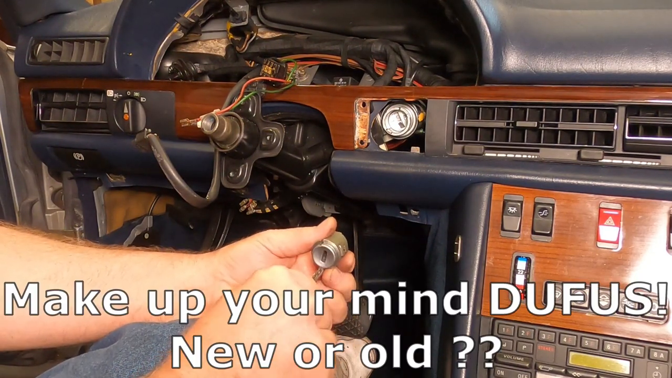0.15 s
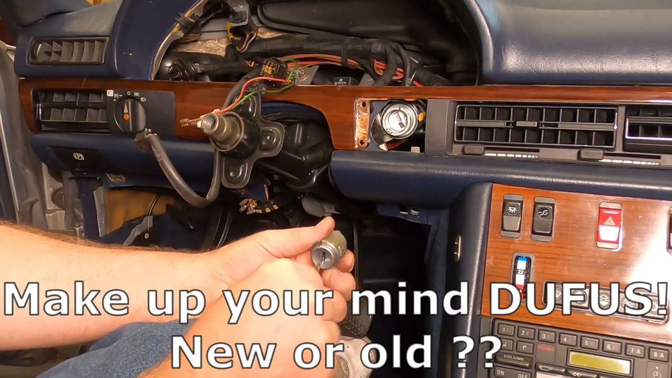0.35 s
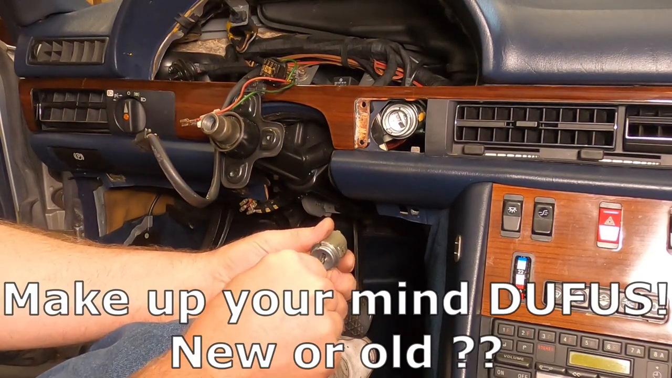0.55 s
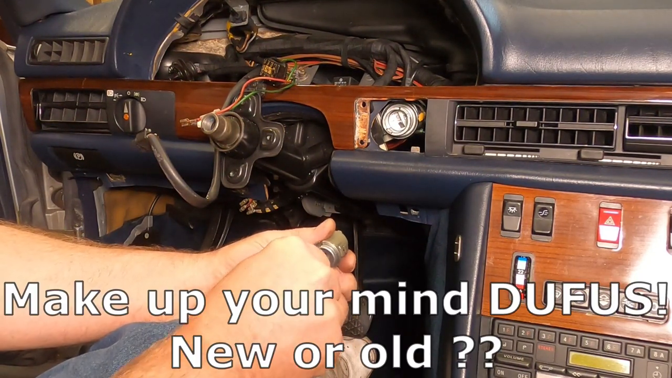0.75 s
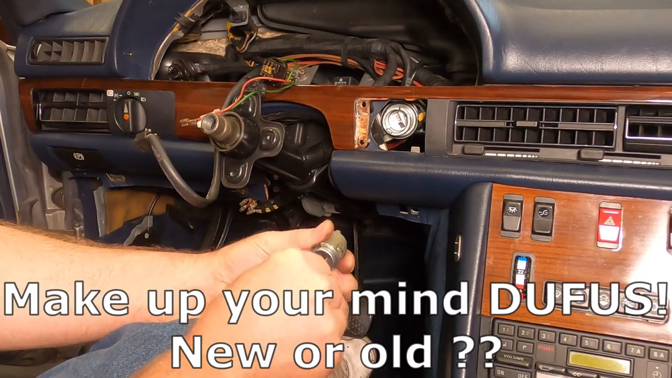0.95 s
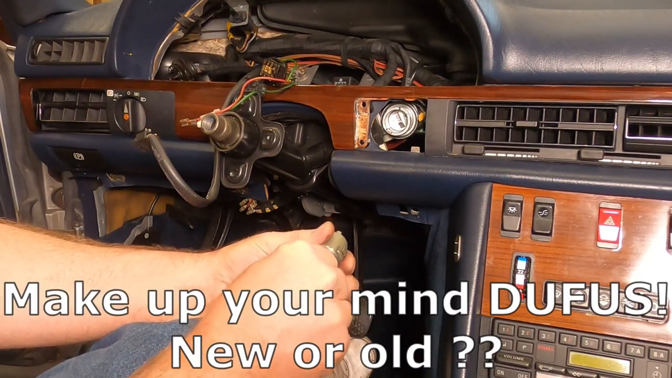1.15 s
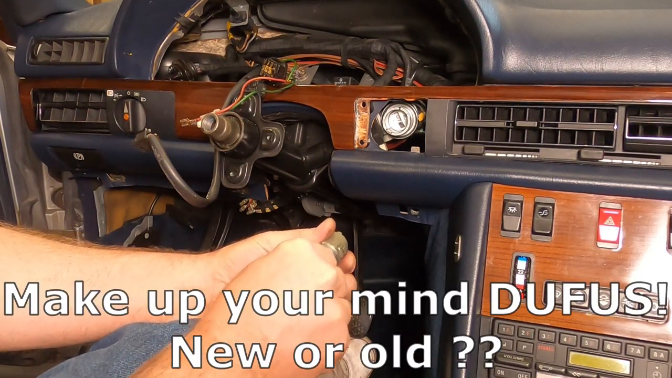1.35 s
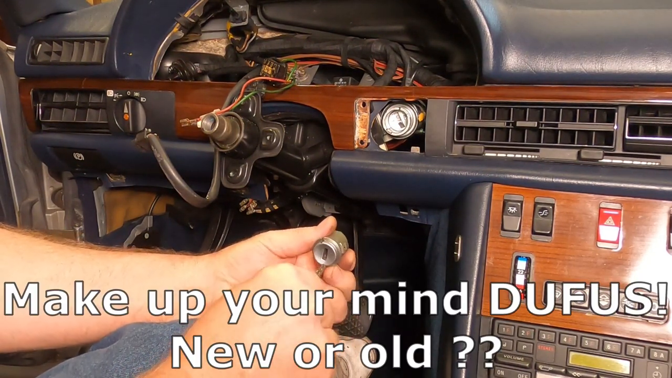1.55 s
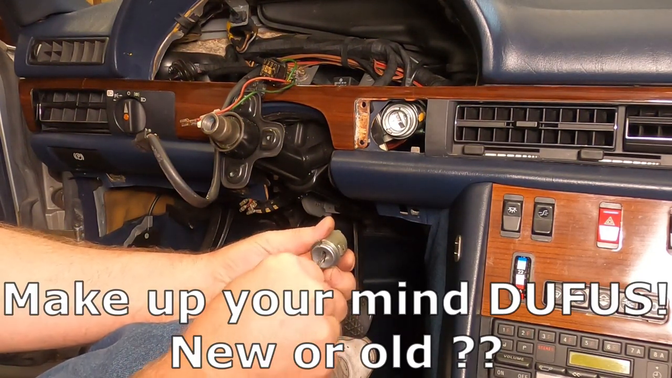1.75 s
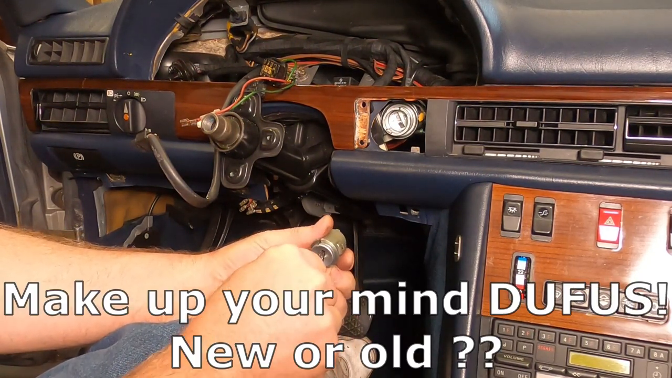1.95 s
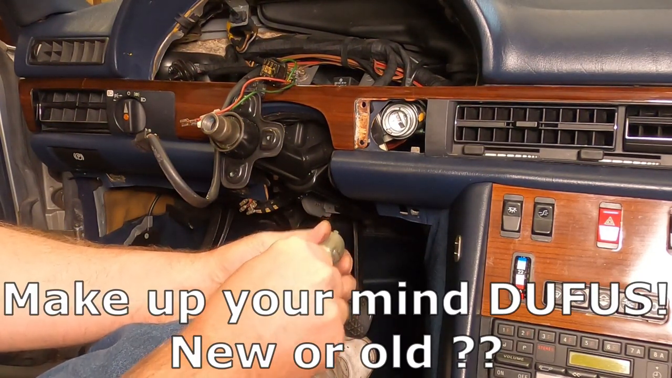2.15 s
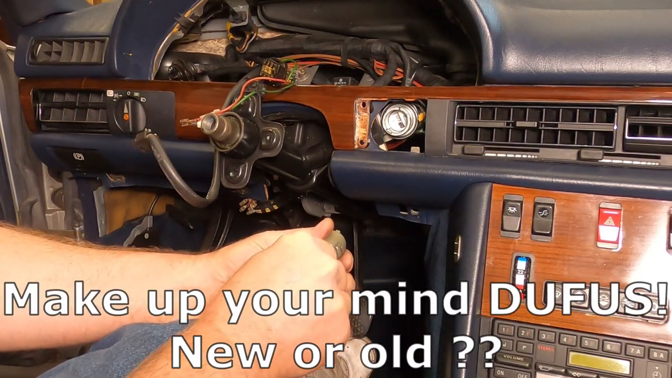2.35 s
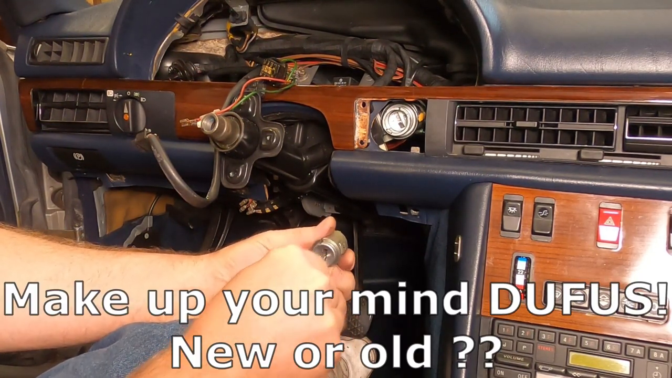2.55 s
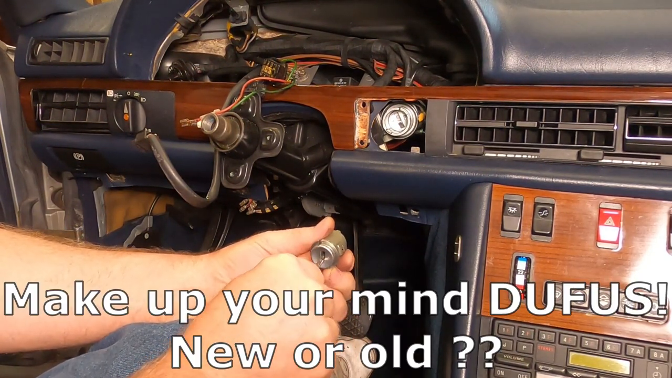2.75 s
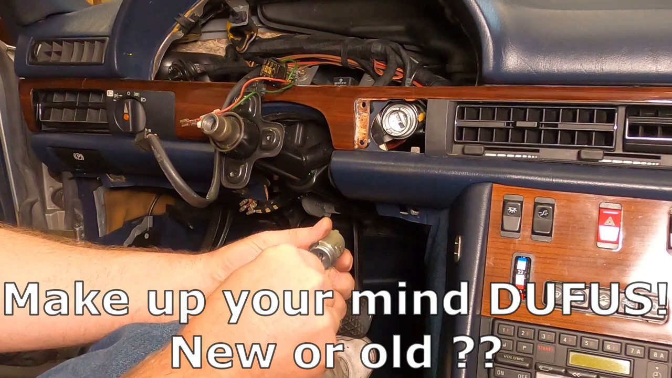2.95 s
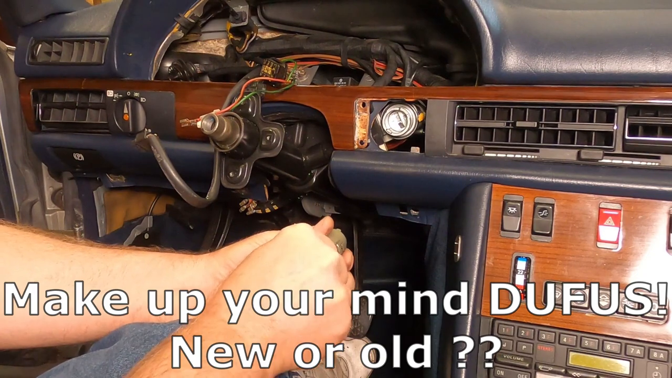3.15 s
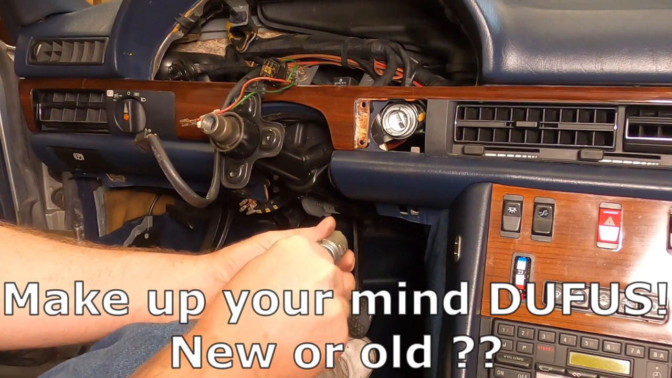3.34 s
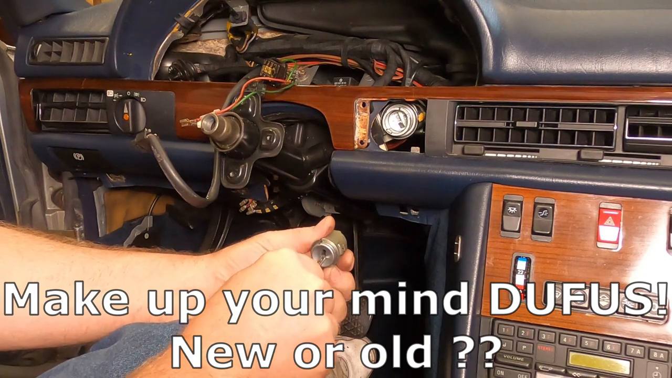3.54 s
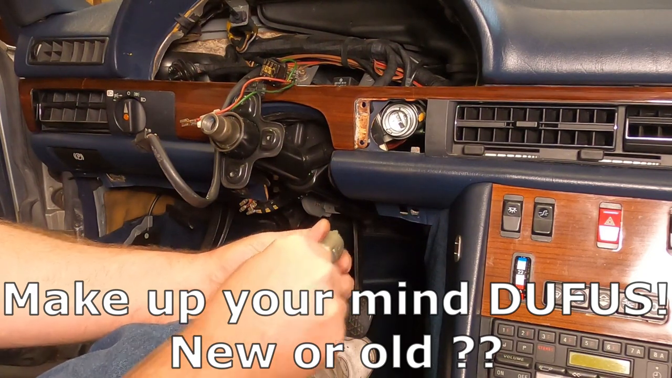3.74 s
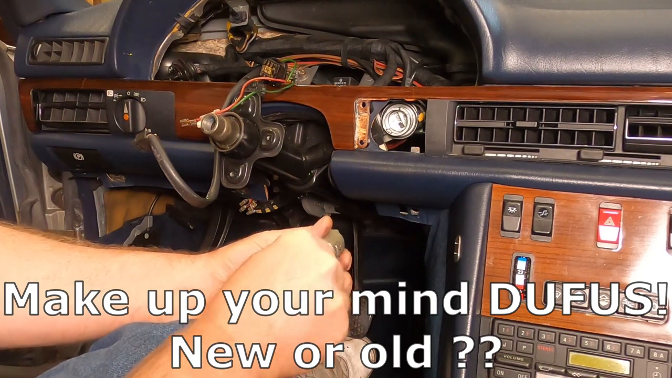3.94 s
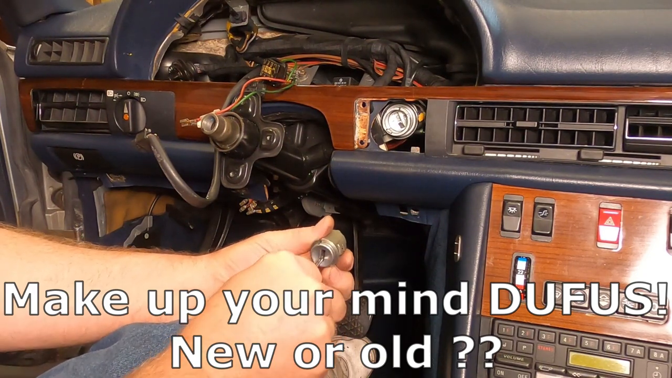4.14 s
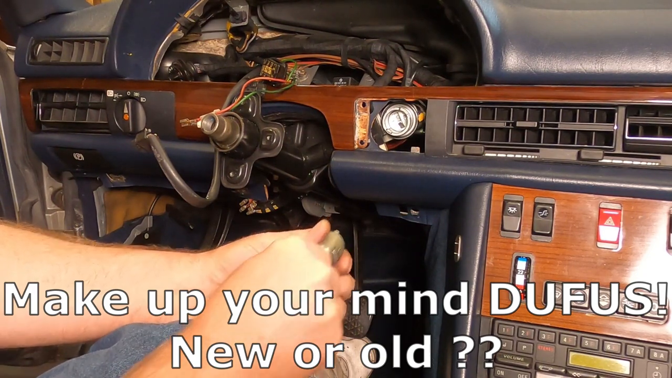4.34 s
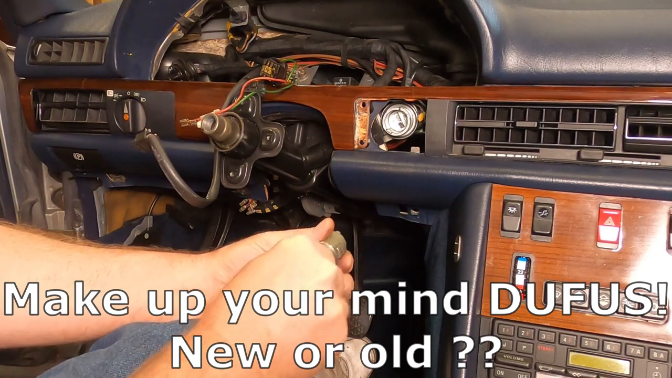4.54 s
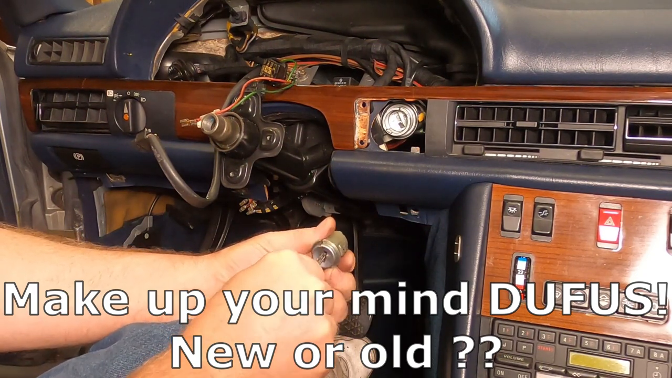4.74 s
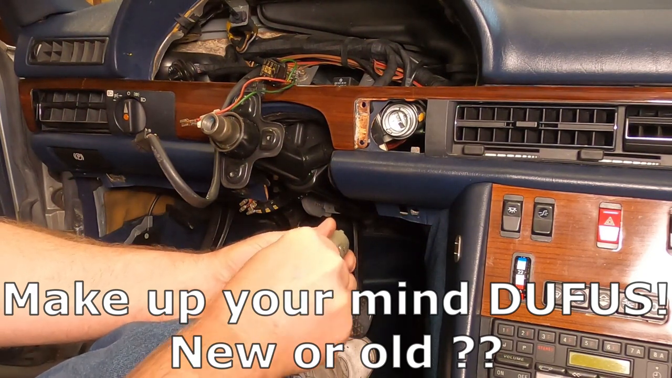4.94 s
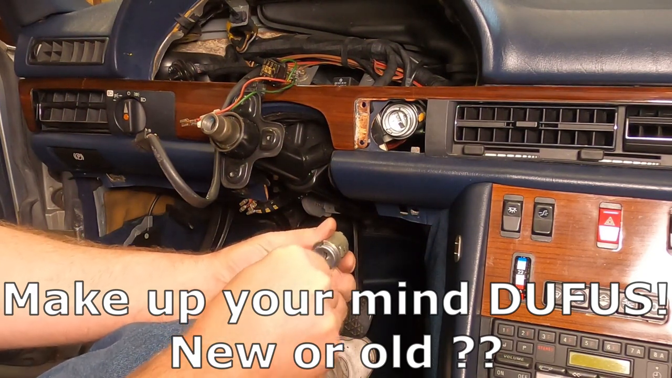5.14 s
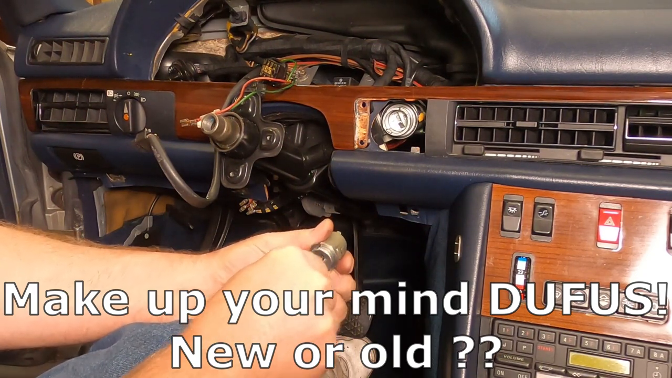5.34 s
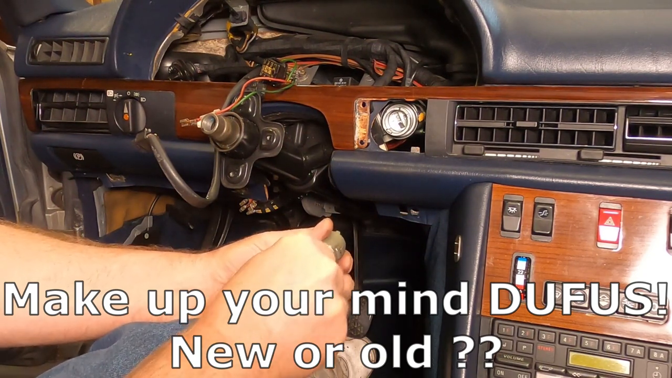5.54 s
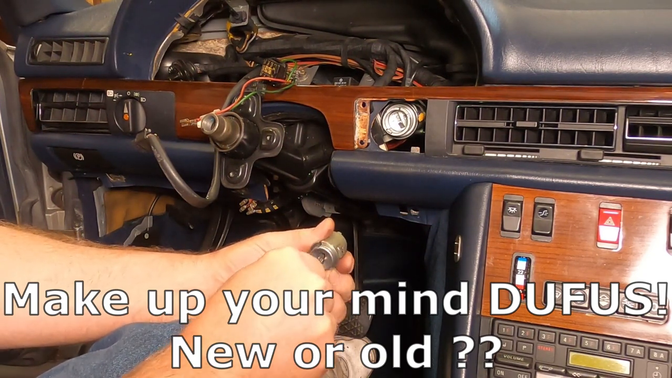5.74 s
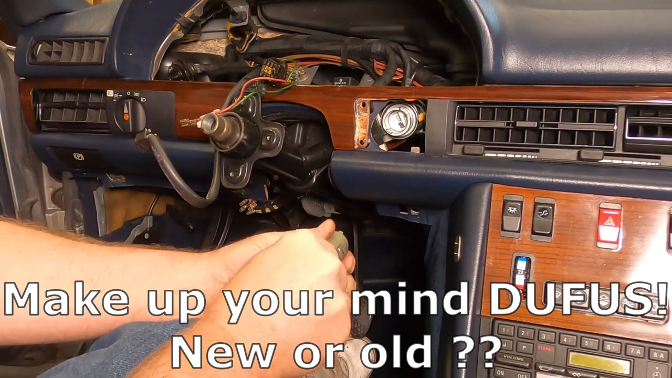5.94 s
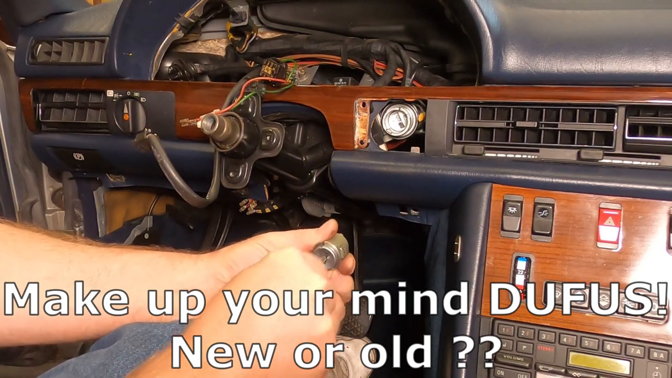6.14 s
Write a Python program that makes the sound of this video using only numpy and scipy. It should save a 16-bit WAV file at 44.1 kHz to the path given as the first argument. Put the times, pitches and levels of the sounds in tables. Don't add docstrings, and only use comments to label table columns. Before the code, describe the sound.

A key works back and forth in a hand-held car ignition lock, eight hard bright metallic snaps linked by tiny ratchety ticks and rattles, close.

```python
import sys
import numpy as np
from scipy import signal
from scipy.fft import rfft, irfft
from scipy.io import wavfile
from scipy.ndimage import uniform_filter1d

SR = 44100
rng = np.random.default_rng(int(sys.argv[2]) if len(sys.argv) > 2 else 0)


def ratio_of_db(decibels):
    return 10 ** (np.asarray(decibels, float) / 20)


def pcm_store(signal):
    levels = np.round(np.clip(np.atleast_2d(signal), -1, 1) * 32767)
    wavfile.write(sys.argv[1], SR, levels.astype(np.int16).T)


N = 272979

# t/s, strike level/dB, rebound level/dB, rebound lag/ms, crack level/dB
SNAPS = [
    (1.2538, -6, -6.5, 2.0, -11),
    (2.3385, -5, -4, 2.15, -4),
    (3.2271, -5, -4, 2.1, -5),
    (3.9333, -3, -3, 2.0, -6),
    (4.5307, -2.8, -3, 1.95, -7),
    (5.0631, -3, -5, 2.0, -8),
    (5.5719, -2, -5, 1.9, -9),
    (6.0671, -4, -6, 1.85, -9),
]
GRASP_DB = [-8, -1.5, -2, -1.5, -3.8, -6.2, -5.8, -4.8]
LOOSE_GRASP_DB = -13

# f/Hz, level/dB, T60/s
STRIKE_MODES = [(4130, -18, 0.036), (4470, 18, 0.011)]
# f/Hz, level/dB, T60/s
REBOUND_MODES = [(4890, 7, 0.0063), (4600, -16.5, 0.014)]
# f/Hz, level/dB, T60/s
CRACK_MODES = [(6902, -0.5, 0.012), (8080, 11.5, 0.0032), (9600, 12.5, 0.0064), (11300, -27.5, .003),
               (14300, -17, .003)]
# f/Hz, level/dB, T60/s
THUD_MODES = [(130, 5, 0.0065), (260, 0.5, 0.0062), (480, -12, .012), (850, -13, 0.0033)]
# f/Hz, level/dB, T60/s
SHELL_MODES = [(2424, 2, 0.028), (3350, -3.5, 0.0062), (3700, -8.5, 0.054)]
# f/Hz, level/dB per Hz
BUZZ = [(710, -68.5), (1200, -26.5), (1630, -20), (2820, -14), (3680, -16.5), (4590, -1.5), (6110, -9),
        (8040, -12.5), (10300, -24), (15000, -40)]
# f/Hz, level/dB per Hz
BAY = [(900, -45), (1700, -22), (2200, -11), (2500, -5), (2900, -12), (3500, -11), (4000, -6), (4300, -7),
       (4700, 2), (5100, -6), (5900, -12), (9700, -17), (15000, -35)]

# f/Hz, level/dB, T60/s
BARREL_MODES = [(2400, -19, .006), (3400, -19, .004), (4000, 0, .013), (4430, -1, .013), (5200, -12, .004),
                (6000, -11, .003)]
# f/Hz, level/dB, T60/s
TUMBLER_MODES = [(6970, 2, 0.0027), (7730, -1, 0.0055), (8280, -7, 0.0058), (9610, 1.5, 0.0076),
                 (9810, 1, 0.0018), (12100, -14.5, 0.0025), (14300, -22, .002)]
# t/s, peak level/dB, treble minus mid level/dB
HANDLING = [(0.1729, -53, -10), (0.4542, -22, -13), (0.4594, -34, -13), (0.4801, -52, -15),
            (0.5207, -48, 3), (0.5523, -46, -16), (0.5791, -55, -15), (0.6173, -36, -8), (0.665, -60, -14),
            (0.7152, -49, -4), (0.7277, -47, -9), (0.7939, -48, -13), (0.848, -56, -12), (0.9512, -41, 3),
            (1.4078, -52, -3), (1.6334, -43, -7), (1.6412, -43, 3), (1.9279, -28, -7), (1.9356, -38, -9),
            (1.9816, -36, -9), (2.1824, -46, 9), (2.8165, -30, -1), (2.881, -55, -12), (2.9448, -50, -13),
            (2.993, -55, -14), (3.0264, -38, -13), (4.8282, -31, -2), (5.3495, -38, -6), (5.8791, -44, 7)]
# t/s, peak level/dB, treble minus mid level/dB
SLACK = [(1.1173, -28, -5), (1.1227, -31, -2), (1.1273, -27, -1), (1.1389, -41, -5), (2.2153, -46, -16),
         (2.2502, -35, -21), (2.255, -35, -3), (2.2646, -48, -11), (3.1409, -33, -3), (3.1571, -30, -5),
         (3.1666, -41, -14), (3.8163, -27, -2), (3.8662, -30, -9), (4.4157, -42, -3), (3.8817, -38, 8),
         (5.0038, -39, -18), (5.2099, -50, -5), (3.4325, -53, -4), (5.4652, -54, -17), (5.4947, -37, -16),
         (5.9794, -33, -11), (5.9861, -26, 4), (5.9948, -36, -1), (6.0001, -33, -3)]
# first tick t/s, last tick t/s, first level/dB, last level/dB
WINDS = [
    (1.2194, 1.2418, -27, -20),
    (2.2945, 2.3269, -28, -21),
    (3.1928, 3.2193, -25, -18),
    (3.8868, 3.9262, -26, -17),
    (4.4827, 4.522, -24, -17),
    (5.0112, 5.0531, -22, -16),
    (5.5126, 5.5627, -24, -19),
    (6.0158, 6.0568, -27, -19),
]
# catch t/s, release t/s, rattle start t/s, rattle end t/s, effort level/dB
RETURNS = [
    (0.0393, 0.0559, 0.0676, 0.14, -29),
    (1.5098, 1.5473, 1.5644, 1.612, -28),
    (2.6169, 2.6515, 2.6706, 2.7276, -29),
    (3.4601, 3.4879, 3.5088, 3.5672, -28),
    (4.1215, 4.1459, 4.1595, 4.2108, -28),
    (4.7099, 4.7338, 4.7475, 4.812, -29),
    (5.2359, 5.2653, 5.2825, 5.3332, -28),
    (5.7449, 5.7757, 5.7947, 5.8654, -28),
]
# lag t/s, level/dB re effort, treble minus mid level/dB
AT_CATCH = [
    (-.009, -19, 12),
    (0, -6.5, 3),
    (.009, -15, -4),
]
# lag t/s, level/dB re effort, treble minus mid level/dB
AT_RELEASE = [
    (0, -.6, -2),
    (-.004, -14, 0),
    (.011, -7, -3),
]
WIND_TREBLE_DB, RATTLE_TREBLE_DB, TREBLE_SPREAD_DB = 0, 8, 4.5
RATTLE_FIRST_DB, RATTLE_LAST_DB = 4, -9
UNEVEN_GAP, UNEVEN_DB = .25, 2.2

# f/Hz, level/dB per Hz
PALM = [(40, -31.5), (110, 1.0), (400, -4.5), (900, -5.5), (2000, -15), (5000, -48)]
# t/s, peak level/dB, f/Hz
GRIP = [
    (1.058, -59, 263),
    (1.444, -53, 349),
    (2.246, -55, 4340),
    (2.419, -51.5, 520),
    (2.507, -61, 4600),
    (3.369, -73, 554),
]

# f/Hz, level/dB per Hz
CABIN = [(600, 3.5), (1700, 4), (2450, 3), (3400, 1), (4700, -6.5), (6000, -3), (9600, -11), (15000, -14)]
# f/Hz, level/dB per Hz
HISS = [(590, -35), (1000, -10), (1350, -16), (1480, -7.5), (1690, -14.5), (3120, -13), (3840, -12.5),
        (4960, -12.5), (16000, -24)]
HISS_DB = -72
# f/Hz, level/dB
HUM = [(80.7, -84.5), (247.6, -78), (479.1, -78.5), (1314, -83.5)]
# f/Hz, level/dB per Hz
RUMBLE = [[(15, -14.5), (45, -6), (85, -1.5), (130, -9.0), (180, -24.5), (400, -47.5)],
          [(60, -50.0), (120, -9.5), (170, -3.5), (260, -3.0), (340, -12.5), (450, -26), (900, -61.5)],
          [(150, -51.5), (280, -6.0), (360, 6.5), (600, 1.0), (1100, -6.5), (1800, -12.5), (4000, -62.0)]]
REST_DB = [-74.5, -77, -77]
# peak t/s, length/s, level/dB over rest
SWELLS = [
    [(0.0, 0.6, 10), (1.33, 0.25, 5), (2.3, .6, 13), (2.8, 1, 9), (3.45, 0.41, 5.2), (4.0, 0.37, 5),
     (4.6, 0.99, 8.6), (5.69, 0.9, 8), (6.19, 0.55, 4.9)],
    [(0.0, 1, 6.5), (1.05, 1, 10.2), (1.55, 1, 10.7), (2.33, .4, 7.1), (3.28, 0.56, 6.3),
     (4.27, 0.52, 13.6), (4.65, .4, 5), (5.69, 0.52, 7)],
    [(0.0, 1, 13.8), (1.5, 0.82, 8), (2.35, 0.35, 9), (3.2, 1, 11), (4.05, 0.55, 6.5), (4.5, 0.23, 2.4),
     (5.69, 0.81, 10.9), (6.15, 0.84, 10)],
]
# f/Hz, level/dB
SIDE_COLOUR = [(20, -2.5), (200, -1), (1000, 3), (3000, -11), (5000, -16), (9000, -9), (16000, -5)]
# f/Hz, level/dB per Hz
SIDE_HISS = [(20, 2.5), (200, -24), (1000, -20), (4000, -20.0), (16000, -17)]


def colour(x, points):
    hz, db = np.transpose(points)
    f = np.arange(len(x) // 2 + 1) * SR / len(x) + 1
    return irfft(rfft(x) * ratio_of_db(np.interp(np.log(f), np.log(hz), db)), len(x))


def level(x, db):
    return x * ratio_of_db(db) / np.sqrt(np.mean(x ** 2))


def peak(x, db):
    return x * ratio_of_db(db) / np.abs(x).max()


def add(track, s, x):
    i = int(s * SR)
    track[i:i + len(x)] += x[:N - i]


def walk(rate):
    k = int(SR / rate)
    steps = np.repeat(rng.standard_normal(N // k + 1), k)
    return 1.15 * uniform_filter1d(uniform_filter1d(steps, k), k)[:N]


def band(x, cutoff_hz, kind):
    return signal.sosfilt(signal.butter(2, cutoff_hz, kind, fs=SR, output="sos"), x)


def ring(modes, luck, spread_db, detune, longest_s, size=1000):
    hz, db, t60 = np.transpose(modes)[:, :, None]
    t, k = np.arange(size) / SR, len(modes)
    hz = hz * (1 + detune * luck[:k, None])
    gain = ratio_of_db(db + spread_db * luck[k:2 * k, None])
    fade = ratio_of_db(-60 * t / np.minimum(t60, longest_s))
    return (gain * np.sin(2 * np.pi * hz * t) * fade).sum(0)


def workshop():
    out, t = np.zeros(N), np.arange(N) / SR
    for hz, db in HUM:
        out += ratio_of_db(db - 1.5 + 0.53 * walk(9)) * np.sin(2 * np.pi * hz * t)
    for shape, rest_db, swells in zip(RUMBLE, REST_DB, SWELLS):
        db = np.full(N, float(rest_db))
        for s, length, gain_db in swells:
            db += gain_db * np.cos(np.pi * np.clip((t - s) / length, -.5, .5)) ** 2
        rumble = level(colour(rng.standard_normal(N), shape), 0)
        out += rumble * ratio_of_db(db + 0.67 * walk(8.1))
    return out + level(colour(rng.standard_normal(N), HISS), HISS_DB)


def run_of_ticks(first_s, last_s, first_db, last_db, treble_db, count):
    gap, size, tone = rng.standard_normal((count, 3)).T
    along = np.cumsum(np.exp(UNEVEN_GAP * gap))
    along = (along - along[0]) / (along[-1] - along[0])
    s = first_s + along * (last_s - first_s)
    db = first_db + along * (last_db - first_db) + UNEVEN_DB * size
    return np.transpose([s, db, treble_db + TREBLE_SPREAD_DB * tone])


def turns():
    rows = [np.array(HANDLING), np.array(SLACK)]
    rows += [run_of_ticks(*wind, WIND_TREBLE_DB, count=6) for wind in WINDS]
    for catch_s, release_s, from_s, to_s, db in RETURNS:
        rattle = run_of_ticks(from_s, to_s, db, db, RATTLE_TREBLE_DB, count=9)
        rattle[[0, -1], 1] = db + RATTLE_FIRST_DB, db + RATTLE_LAST_DB
        rows.append(np.array(AT_CATCH) + (catch_s, db, 0))
        rows.append(np.array(AT_RELEASE) + (release_s, db, 0))
        rows.append(rattle)
    return np.concatenate(rows)


def ticks(hits):
    out, taps, t = np.zeros(N), np.zeros(N), np.arange(260) / SR
    luck = rng.standard_normal((len(hits), 560))
    contact = np.minimum(t / .0005, 1) * ratio_of_db(-60 * t / .009)
    for k, ((s, db, bright_db), row) in enumerate(zip(hits, luck)):
        loose = k < len(HANDLING) + len(SLACK)
        low_contact, high_contact = contact * row[40:300], contact * row[300:]
        if loose:
            add(taps, s, peak(low_contact, db - 13))
            bright_db = bright_db - 3.5
        low = ring(BARREL_MODES, row, 2, .015, .005 if loose else .013, size=500)
        high = ring(TUMBLER_MODES, row[12:], 3, .04, .004, size=500)
        low, high = np.convolve(low, low_contact), np.convolve(high, high_contact)
        add(out, s - .0004, peak(level(low, 0) + level(high, bright_db - 0.5), db + 4.5))
    return out, band(taps, 1200, "low")


def grasp(s):
    db = np.full(len(s), float(LOOSE_GRASP_DB))
    for wind, snap, firm_db in zip(WINDS, SNAPS, GRASP_DB):
        db[(s >= wind[0]) & (s <= snap[0])] = firm_db
    return db


def rubbing(hits):
    contacts = [tuple(tick[:2]) for tick in hits] + [(snap[0], -20) for snap in SNAPS]
    s, db = np.transpose(sorted(contacts))
    pressure = np.zeros(N)
    for a, b, before_db, after_db in zip(s, s[1:], db, db[1:]):
        if b - a < .017:
            push_db = .75 * before_db + .25 * after_db - 11.5 - 450 * (b - a)
            pressure[int(a * SR):int(b * SR)] = ratio_of_db(push_db)
    grit = rng.standard_normal(N) * ratio_of_db(4.5 * walk(500)) * uniform_filter1d(pressure, 90)
    still = np.zeros(40)
    body = ring(BARREL_MODES, still, 0, 0, .013) + ratio_of_db(5) * ring(TUMBLER_MODES, still, 0, 0, .004)
    grind = signal.fftconvolve(grit, body / np.sqrt(np.sum(body ** 2)))[:N]
    skin = level(colour(rng.standard_normal(N), PALM), -2.5)
    effort = np.abs(uniform_filter1d(pressure, 300)) ** 1.186
    creak = skin * ratio_of_db(3.2 * walk(160) + grasp(np.arange(N) / SR)) * effort
    return grind, creak


def cabin(x):
    t = np.arange(int(.4 * SR)) / SR
    onset = np.clip((t - .0025) / 0.0013, 0, 1)
    early = rng.standard_normal(len(t)) * ratio_of_db(-32 - 60 * t / 0.089)
    late = level(colour(rng.standard_normal(len(t)), CABIN), -54.0) * ratio_of_db(-60 * t / 0.31)
    return signal.fftconvolve(x, onset * (early + late))[:N]


def grip():
    out, t = np.zeros(N), np.arange(900) / SR
    for (s, db, hz), noise in zip(GRIP, rng.standard_normal((len(GRIP), len(t)))):
        shape = [(hz / 4, -30), (hz / 1.1, -3), (hz, 0), (hz * 2.7, -3), (hz * 1.5, -30)]
        add(out, s, peak(colour(noise, shape) * ratio_of_db(-60 * t / 0.27), db))
    return out


def snaps():
    out, thumps = np.zeros(N), np.zeros(N)
    luck = rng.standard_normal((len(SNAPS), 60))
    t = np.arange(36) / SR
    landing = np.sin(2 * np.pi * 4250 * t) * ratio_of_db(-9 * t / 0.00035)
    bounce = np.hanning(len(t)) * np.sin(2 * np.pi * 4700 * t)
    chatter = np.zeros(40)
    chatter[[0, 11, 32]] = 1, .8, .7
    after = np.arange(int(.35 * SR)) / SR
    swell = np.clip(after / 0.0016, 0, 1)
    jolt_s = 0.00045
    knock = np.gradient(np.exp(-(np.arange(-80, 80) / SR / jolt_s) ** 2))
    for (s, strike_db, rebound_db, lag_ms, crack_db), row, firm_db in zip(SNAPS, luck, GRASP_DB):
        strike = ring(STRIKE_MODES, row, 1.5, .01, .012)
        rebound = ring(REBOUND_MODES, row[4:], 1.5, .01, .012)
        crack = ring(CRACK_MODES, row[14:], 2.5, .03, .005)
        thud = ring(THUD_MODES, row[24:], 2.5, .06, .03)
        shell = ring(SHELL_MODES, row[32:], 2, .015, .03)
        shell *= np.minimum(np.arange(len(shell)) / 50, 1)
        buzz = level(colour(rng.standard_normal(len(after)), BUZZ), strike_db - 16.0)
        bay = level(colour(rng.standard_normal(len(after)), BAY), strike_db - 40)
        tail = buzz * ratio_of_db(-60 * after / 0.072) + bay * ratio_of_db(-60 * after / 0.39)
        add(thumps, s - .001, peak(knock, strike_db - 26.5 + firm_db))
        add(thumps, s, thud * ratio_of_db(strike_db - 40.0))
        add(out, s, peak(np.convolve(strike, landing), strike_db + .2))
        add(out, s + lag_ms / 1000, peak(np.convolve(rebound, bounce), rebound_db + .7))
        add(out, s, peak(np.convolve(crack, chatter), crack_db))
        add(out, s + 0.0017, shell * ratio_of_db(strike_db - 17.5 + 0.54 * firm_db))
        add(out, s + .001, swell * tail)
    return band(out, (1400, 13500), "band") + thumps


def scene():
    hits = turns()
    grind, palm = rubbing(hits)
    clicks, taps = ticks(hits)
    tumblers = band(clicks + grind, (3100, 14000), "band")
    small = tumblers + palm + taps + grip()
    mid = small + cabin(small) + band(snaps(), 100, "high") + workshop()
    side_colour = level(colour(rng.standard_normal(512), SIDE_COLOUR), 0)
    side = ratio_of_db(-24) * signal.fftconvolve(mid, side_colour / np.sqrt(len(side_colour)))[:N]
    side += level(colour(rng.standard_normal(N), SIDE_HISS), -81)
    return np.array([mid + side, mid - side])


def band_limit(x):
    return signal.sosfilt(signal.butter(12, 16970, fs=SR, output="sos"), x)


def record(dry):
    top_hz = 15900
    mix = signal.sosfilt(signal.ellip(8, .3, 50, top_hz, fs=SR, output="sos"), dry)
    return band_limit(mix)


dry = scene()
out = record(dry)
pcm_store(out)
```